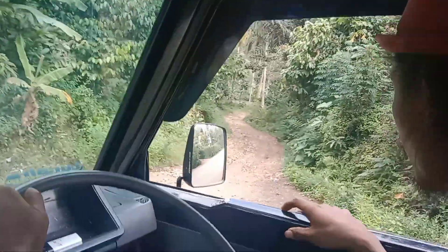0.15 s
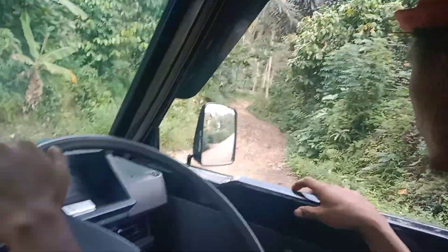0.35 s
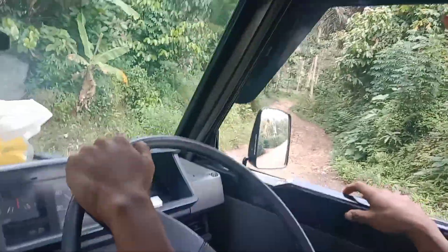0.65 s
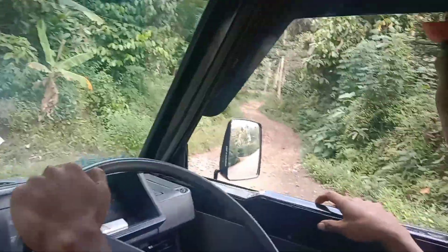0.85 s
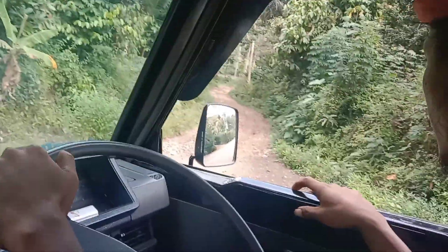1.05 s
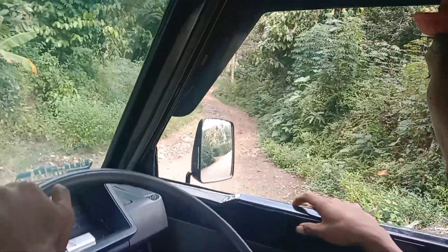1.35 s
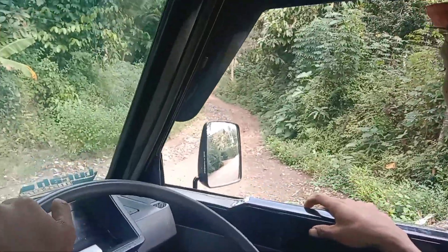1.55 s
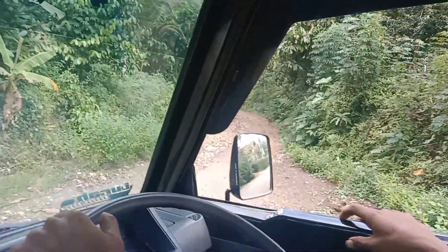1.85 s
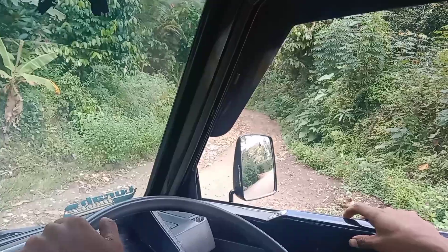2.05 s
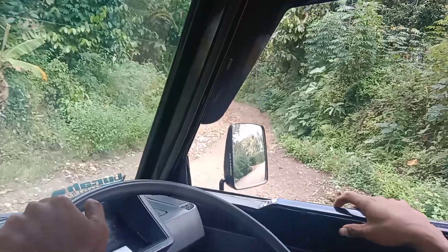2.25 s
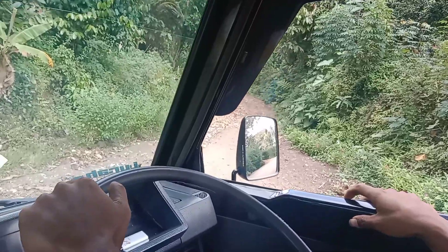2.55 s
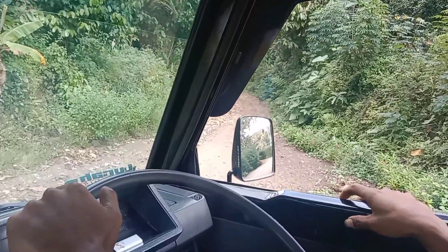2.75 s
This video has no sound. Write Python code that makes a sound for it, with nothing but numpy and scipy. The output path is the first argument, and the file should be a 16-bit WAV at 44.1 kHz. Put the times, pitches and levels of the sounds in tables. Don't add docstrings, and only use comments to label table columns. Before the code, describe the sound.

Low uneven engine boom heard from within a crawling truck cab, with soft seat creaks and wheel thumps, a cluster of sharp metal clacks, a high squeak, a late rattle, and insects hissing outside.

```python
import sys
import numpy as np
from scipy import signal
from scipy.io import wavfile

SR = 44100
rng = np.random.default_rng(int(sys.argv[2]) if len(sys.argv) > 2 else 0)


def decibels_to_gain(level_db):
    exponent = np.asarray(level_db, float) / 20
    return 10 ** exponent


def unload_audio(sound):
    columns = np.transpose(np.atleast_2d(sound))
    steps = np.round(np.clip(columns, -1, 1) * 32767)
    wavfile.write(sys.argv[1], SR, steps.astype(np.int16))


N = 127890

# time_s, firings_per_s
FIRING = [(0, 24.0), (1.0, 23.9), (1.45, 24.5), (2.2, 24.6), (2.9, 25.7)]
# time_s, cabin_db, roof_db
ENGINE_BOOM = [(0, -48, -30), (.1, -45.5, -36.5), (.2, -55.5, -51), (.36, -44.5, -44.5), (.5, -48, -46),
               (.57, -87, -61), (.66, -57, -40.5), (.85, -55.5, -40), (1.05, -56, -42.5), (1.12, -48, -41),
               (1.5, -47, -31), (1.56, -57, -84), (1.86, -42, -51), (2.0, -54, -55), (2.2, -38.5, -54),
               (2.45, -38, -51), (2.64, -50, -56.5), (2.75, -38, -48)]
# multiple_of_firing_rate, level_db
CABIN_ORDERS = [(2, -5.5), (3, 2.5), (4, -6.5)]
ROOF_ORDERS = [(4, -8.5), (5, -2), (6, -9), (7, -14)]
# pitch_hz, width_hz, level_db
PANELS = [(308, 13.2, -57.5), (522, 290, -68), (683, 4.5, -63), (1030, 187, -64), (1410, 400, -72),
          (1903, 102, -67)]
# time_s, level_db
PANEL_BUZZ = [(0, -19), (1.3, -3), (1.55, -6.5), (1.9, 8.5), (2.05, -7.5), (2.3, 0), (2.9, 3.5)]
# time_s, level_db
SHAKE = [(0.0, -43.5), (0.41, -49), (2.9, -53.5)]
# pitch_hz, level_db_per_hz
ROAD_COLOUR = [(18, -49), (30, -20), (90, -4), (161, -3.5), (402, -17.5), (691, -17), (787, -38),
               (1630, -12), (2600, -48), (3380, -67), (5720, -120)]
AIR_COLOUR = [(2000, -28), (2600, -0.5), (3300, 7), (5000, 3.5), (8500, -5.5), (11000, -23), (15700, 0)]
# time_s, pitch_hz, level_db
CRICKET = [(0, 4380, -66.5), (1.0, 4334, -70), (1.6, 4310, -62), (2.15, 4377, -64), (2.9, 4320, -66.5)]
# start_s, level_db, rise_s, t60_s
CLACKS = [
    [(1.081, -24.5, .011, 0.086), (1.101, -29, 0.0028, 0.034), (1.116, -34, 0.0044, 0.13)],
    [(1.223, -36.5, 0.0031, 0.089), (1.2437, -17, 0.0023, 0.096), (1.254, -24, 0.0046, 0.11)],
    [(1.268, -15.5, 0.0016, 0.046)],
    [(1.803, -20.5, 0.015, 0.069)],
    [(2.441, -34.5, 0.0023, 0.08), (2.4495, -18.5, 0.0044, 0.076), (2.462, -19.5, 0.0068, 0.09),
     (2.494, -39, 0.0044, 0.068)],
    [(0.0, -38.5, 0.00072, 0.25)],
]
# pitch_hz, level_db
TRAY = [(533, -2.5), (705, 6.5), (975, -3), (1070, -5.5), (1373, 0), (1650, -27), (1922, -19), (2700, -3.5)]
LATCH = [(855, -8), (1210, -5), (1375, -2), (1660, -2), (1855, -5.5), (1975, -1), (2900, -12), (3300, -1.5),
         (4800, -5), (5216, 2.5), (5507, -3), (5884, 2), (6250, 0), (7030, -18)]
PIN = [(14800, 5.5), (15100, -8)]
HINGE = [(1200, -2.5), (1561, -0.5), (1814, -5), (2094, 2.5), (2374, -4), (2832, -7.5), (4194, -8),
         (4474, -6), (4743, -7), (5220, 2), (5750, 5), (6347, 2)]
BRACKET = [(700, -11), (883, -11), (1200, -8.5), (1410, -1.5), (1570, -2), (1750, -1), (2089, -3),
           (3488, -13), (4400, -3.5), (4759, -15), (5300, -1), (5744, -0.5)]
DOOR = [(990, -11), (1380, 2.5), (1470, 7.5), (1660, -10), (1810, -2), (2170, 2.5)]
# pitch_hz, level_db_per_hz
TRAY_CRACK = [(180, -34), (300, -2.5), (974, -1), (2770, -2.5), (4120, -10.5), (6890, -18), (15800, -92)]
LATCH_CRACK = [(240, -67), (400, -44), (837, 7), (1830, 6), (2650, -13), (6090, -4.5), (15100, -6.5),
               (15800, -22)]
HINGE_CRACK = [(450, -35), (700, -15), (1550, -7.5), (2420, -2), (3240, -9), (5720, 2), (8500, -21.5),
               (15700, -24)]
# start_s, length_s, pitch_hz, glide_hz, level_db
CREAKS = [(0.095, 0.2, 1920, 30, -57), (0.1, 0.11, 1440, 10, -55), (.49, .08, 1940, 0, -60),
          (.3, .05, 1000, 0, -57), (.42, .03, 1010, 0, -56), (.44, .06, 570, -20, -58),
          (.59, .04, 580, 0, -56), (0.295, 0.066, 1450, -1, -56), (0.416, 0.023, 535, 8, -49.5),
          (0.492, 0.068, 480, -50, -51), (0.691, 0.1, 590, -74, -56), (0.883, 0.062, 1503, 36, -54),
          (0.928, 0.025, 565, 11, -53), (1.319, 0.061, 1892, 67, -53.5), (1.0, .08, 1480, 0, -54),
          (2.224, .09, 714.5, -2, -59.5), (2.76, 0.2, 694, 10.5, -52)]
# start_s, level_db, length_s
TWIGS = [(0.355, -68, .004), (0.365, -47, 0.0084), (0.624, -54.5, 0.0062), (1.058, -45.5, 0.0067),
         (1.402, -59, 0.0064), (1.473, -70, 0.031), (1.755, -50, 0.0082), (1.93, -64, 0.09),
         (2.053, -63, 0.013), (2.075, -61.5, 0.035), (2.775, -63.5, 0.029)]
# pitch_hz, level_db_per_hz
TWIG_COLOUR = [(1180, -53), (2000, -16), (3540, -5), (5900, -27), (7010, -3), (15800, -27)]
# start_s, level_db, pitch_hz, t60_s
RUTS = [
    (0.467, -33.5, 151, 0.054),
    (0.788, -26, 134, 0.045),
    (0.94, -29, 64.6, 0.26),
    (1.092, -28.5, 198, 0.017),
    (1.195, -29, 143, 0.032),
    (1.268, -32, 61, 0.14),
    (1.489, -32, 106, 0.041),
    (2.499, -34.5, 316, 0.12),
]
# start_s,
# pitch_hz, level_db, rise_s, t60_s
PINGS = [(1.145, 1690, -45, .008, .08), (1.2235, 5750, -41, .003, .06), (1.225, 3250, -48, .004, .08),
         (1.228, 1520, -40, .004, .08), (1.2447, 5700, -16, .0013, .015), (1.398, 5330, -50, .004, .07),
         (1.75, 9000, -49, .003, .04), (1.752, 3600, -51, .004, .07), (2.442, 1750, -37, .004, .06),
         (2.4497, 5750, -18, .0017, .02), (2.4625, 5750, -17, .0015, .022), (2.469, 1570, -21, .002, .04),
         (2.075, 15000, -58, .006, .06), (2.84, 2380, -55, .02, .12)]
# time_s, pitch_hz, level_db
CHIRP = [(1.434, 2287, -69), (1.442, 2269, -39), (1.468, 2390, -56.5), (1.478, 2307, -45.5),
         (1.5, 2377, -51), (1.55, 2250, -65), (1.59, 2220, -74)]
SQUEAK = [(1.852, 2580, -62), (1.87, 2720, -44), (1.886, 2990, -39), (1.908, 3080, -29), (1.925, 3260, -29),
          (1.948, 3200, -36), (1.955, 3260, -26), (1.964, 3250, -39), (2.06, 3160, -58)]
STRAND = [(1.88, 2677, -70), (1.9, 2900, -48), (1.94, 2996, -48), (2.0, 3067, -55), (2.05, 3023, -49.5),
          (2.09, 2880, -74)]
CHIRP_HARMONICS = [2, -7.5, -10.5, -15.5, -26]
SQUEAK_HARMONICS = [-1, -2.5, -21, -31.5, -32]


def rms_one(x):
    return x / np.sqrt(np.mean(x ** 2) + 1e-20)


def in_time(rows):
    s, *columns = np.transpose(rows)
    return [np.interp(np.arange(N) / SR, s, c) for c in columns]


def drift(rate_hz):
    r = np.exp(-40 * np.pi * rate_hz / SR)
    noise = rng.standard_normal(N // 20 + 3002)
    slow = signal.lfilter([1], [1, -2 * r, r * r], noise)[3000:]
    return np.interp(np.arange(N) / 20, np.arange(len(slow)), rms_one(slow))


def ring(x, hz, t60):
    r, w = decibels_to_gain(-60 / (t60 * SR)), 2 * np.pi * hz / SR
    return signal.lfilter([0, np.sin(w)], [1, -2 * r * np.cos(w), r * r], x + 1e-18)


def coloured(spectrum, x, patchy_db=0.):
    hz, db = np.transpose(spectrum)
    edges = np.geomspace(20, 15800, 28)
    out = 0
    for k, (low, high) in enumerate(zip(edges, edges[1:])):
        band_pass = signal.butter(2, [low, high], "band", fs=SR, output="sos")
        band = signal.sosfilt(band_pass, np.roll(x, 997 * k))
        flicker = patchy_db * drift(2.8) if patchy_db else 0
        level_db = np.interp(np.log(low * high) / 2, np.log(hz), db, left=-99, right=-99)
        out = out + band * decibels_to_gain(level_db + flicker)
    return rms_one(out)


def burst(start, rise, t60):
    t = np.arange(N) / SR - start
    return np.clip(t / rise, 0, 1) * decibels_to_gain(-60 * np.clip(t - rise, 0, 1) / t60)


def engine():
    (firing_hz,), (cabin_db, roof_db) = in_time(FIRING), in_time(ENGINE_BOOM)
    (buzz_db,) = in_time(PANEL_BUZZ)
    firings = np.cumsum(firing_hz) / SR
    out = np.zeros(N)
    for orders, boom_db in ((CABIN_ORDERS, cabin_db), (ROOF_ORDERS, roof_db)):
        for multiple, db in orders:
            level = decibels_to_gain(boom_db + db + 4 * drift(8))
            cycles = round(multiple) * firings + rng.random() + 0.055 * drift(3.1)
            out += level * np.sin(2 * np.pi * cycles)
    knock_share, knock_s = 0.24, 0.025
    since_firing_s = (firings % 1) / firing_hz
    knock = 1 + knock_share * 4 * np.exp(-since_firing_s / knock_s)
    for hz, width_hz, db in PANELS:
        noise = knock * rng.standard_normal(N)
        narrow_buzz_db = (width_hz < 40) * buzz_db
        level = decibels_to_gain(db + narrow_buzz_db + 3.5 * drift(9.4))
        out += level * rms_one(ring(noise, hz, 2.05 / width_hz))
    return out


def road():
    (shake_db,) = in_time(SHAKE)
    level = decibels_to_gain(-52.5 + .4 * (shake_db - shake_db.mean()))
    return level * coloured(ROAD_COLOUR, rng.standard_normal(N), patchy_db=3.0)


def air():
    noise = rng.standard_normal(N) * decibels_to_gain(2.5 * drift(40))
    return decibels_to_gain(-65) * coloured(AIR_COLOUR, noise, patchy_db=.8)


def grit():
    ticks_per_s = 500 * decibels_to_gain(6.0 * drift(5))
    strength = decibels_to_gain(2.6 * rng.exponential(1, N).clip(0, 4))
    ticks = (rng.random(N) < ticks_per_s / SR) * strength
    pitch_number = rng.integers(0, 12, N)
    out = np.zeros(N)
    for k, hz in enumerate(np.geomspace(8000, 15300, 12)):
        out += ring(ticks * (pitch_number == k), hz, 60.0 / hz)
    return decibels_to_gain(-76.5) * rms_one(out)


def insects():
    band = signal.butter(3, [6476, 7396], "band", fs=SR, output="sos")
    chorus = rms_one(signal.sosfilt(band, rng.standard_normal(N)))
    chorus *= decibels_to_gain(-55.5 + drift(9.8) + 2.0 * drift(55))
    hz, db = in_time(CRICKET)
    phase = 2 * np.pi * np.cumsum(hz + 20.7 * drift(25)) / SR
    cricket = np.sin(phase) * decibels_to_gain(db + 5.5 + 3 * drift(50))
    return chorus + cricket


def clacks():
    bodies = [(TRAY, TRAY_CRACK), (LATCH, LATCH_CRACK), (PIN, None),
              (HINGE, HINGE_CRACK), (BRACKET, HINGE_CRACK), (DOOR, HINGE_CRACK)]
    size = 9000
    bright_hz, bright_fade = 2600, 1.7
    contacts_per_s, ring_s = 4000, 0.05
    low = signal.butter(2, bright_hz, "low", fs=SR, output="sos")
    high = signal.butter(2, bright_hz, "high", fs=SR, output="sos")
    out = np.zeros(N + size)
    for (modes, crack), rows in zip(bodies, CLACKS):
        for s, db, rise, t60 in rows:
            shape = burst(0, rise, t60)[:size]
            bright_shape = shape ** bright_fade
            hits = rng.standard_normal(size) * (rng.random(size) < contacts_per_s / SR)
            sound = np.zeros(size)
            for k, (hz, mode_db) in enumerate(modes):
                push = np.roll(hits, 50 * k) * (bright_shape if hz > bright_hz else shape)
                mode = ring(push, hz, min(ring_s * 1500 / hz, .1))
                sound += decibels_to_gain(mode_db - 4.5) * mode / np.abs(mode).max()
            if crack is not None:
                noise = coloured(crack, rng.standard_normal(size))
                dull = shape * signal.sosfilt(low, noise)
                bright = bright_shape * signal.sosfilt(high, noise)
                sound += decibels_to_gain(-1) * (dull + bright)
            i = int(max(s, 0) * SR)
            out[i:i + size] += decibels_to_gain(db) * sound
    return signal.sosfilt(signal.butter(2, 380, "high", fs=SR, output="sos"), out[:N])


def creaks():
    t = np.arange(N) / SR
    flutter, waver = decibels_to_gain(5.0 * drift(60)), .03 * drift(50)
    out = np.zeros(N)
    for s, length, hz, glide, db in CREAKS:
        u = np.clip((t - s) / length, 0, 1)
        swell = np.sqrt(2 * np.sin(np.pi * u).clip(0))
        pitch = (hz + glide * u) * (1 + waver * 500 / hz)
        out += decibels_to_gain(db) * swell * np.sin(2 * np.pi * np.cumsum(pitch) / SR)
    return out * flutter


def twigs():
    t = np.arange(N) / SR
    shape = np.zeros(N)
    for s, db, length in TWIGS:
        rise = np.clip((t - s) / 0.003, 0, 1)
        fall = decibels_to_gain(-60 * np.clip(t - s - length, 0, 1) / 0.045)
        shape += decibels_to_gain(db) * rise * fall
    return shape * coloured(TWIG_COLOUR, rng.standard_normal(N))


def ruts():
    t = np.arange(N) / SR
    out = np.zeros(N)
    for s, db, hz, t60 in RUTS:
        out += decibels_to_gain(db) * burst(s, 0.012, t60) * np.sin(2 * np.pi * hz * (t - s))
    return out


def pings():
    t = np.arange(N) / SR
    out = np.zeros(N)
    for s, hz, db, rise, t60 in PINGS:
        out += decibels_to_gain(db) * burst(s, rise, t60) * np.sin(2 * np.pi * hz * (t - s))
    return out * decibels_to_gain(2.0 * drift(200))


def squeal(rows, harmonics_db, rough, haze):
    hz, db = in_time(rows)
    t = np.arange(N) / SR
    phase = 2 * np.pi * np.cumsum(hz * (1 + rough * drift(119))) / SR
    tone = np.zeros(N)
    for k, harmonic_db in enumerate(harmonics_db):
        n = k + 1
        level = decibels_to_gain(harmonic_db + (k - 1.0) * drift(56))
        skirt = haze * n * drift(150 * n) * np.cos(n * .97 * phase)
        tone += level * (np.sin(n * phase) + skirt)
    sounding = (t > rows[0][0]) * (t < rows[-1][0])
    return np.sqrt(2) * decibels_to_gain(db) * tone * sounding


def squeaks():
    chirp = squeal(CHIRP, CHIRP_HARMONICS, rough=0.00445, haze=0.1)
    squeak = squeal(SQUEAK, SQUEAK_HARMONICS, rough=.007, haze=0.28)
    strand = squeal(STRAND, SQUEAK_HARMONICS, rough=0.0145, haze=0.16)
    return chirp + squeak + strand


def cab(x):
    t = np.arange(int(.25 * SR)) / SR
    tail = signal.lfilter([.5], [1, -.5], rng.standard_normal(len(t)))
    tail = tail * decibels_to_gain(-60 * t / 0.081) * (t > .003)
    return signal.fftconvolve(x, tail / np.sqrt(np.sum(tail ** 2)))[:N]


def scene():
    near = clacks() + creaks() + twigs() + pings() + squeaks()
    outside = road() + air() + grit() + insects()
    return (engine() + outside + near + decibels_to_gain(-8.5) * cab(near) + ruts())[None]


def band_limit(x):
    return signal.sosfilt(signal.butter(12, 16330, fs=SR, output="sos"), x)


def record(dry):
    top_cut = signal.cheby2(12, 60, 16100, fs=SR, output="sos")
    mix = signal.sosfilt(top_cut, dry)
    return band_limit(mix)


dry = scene()
out = record(dry)
unload_audio(out)
```